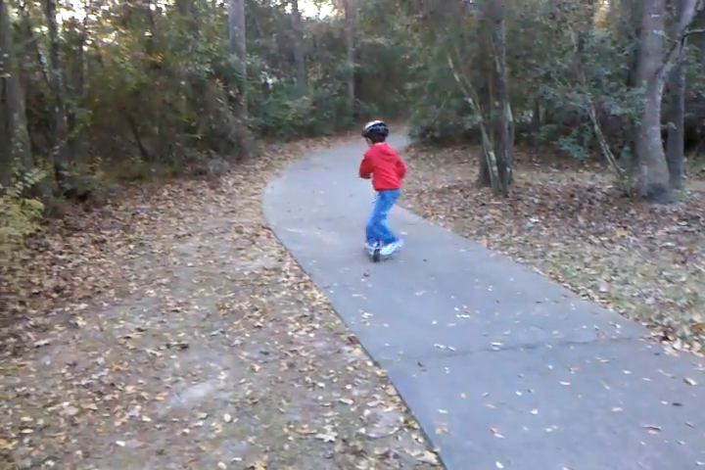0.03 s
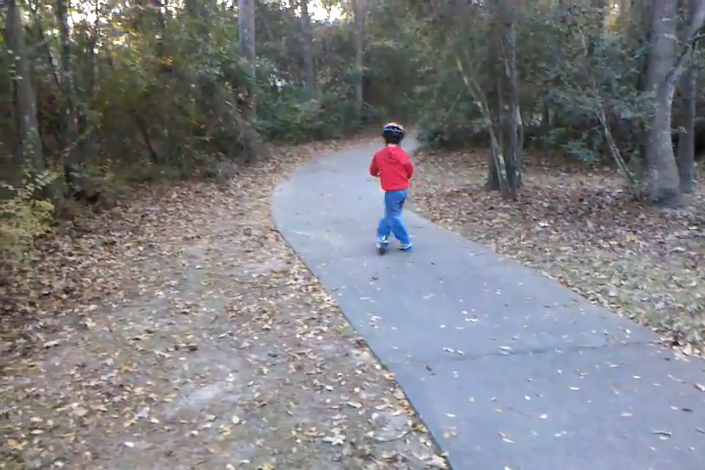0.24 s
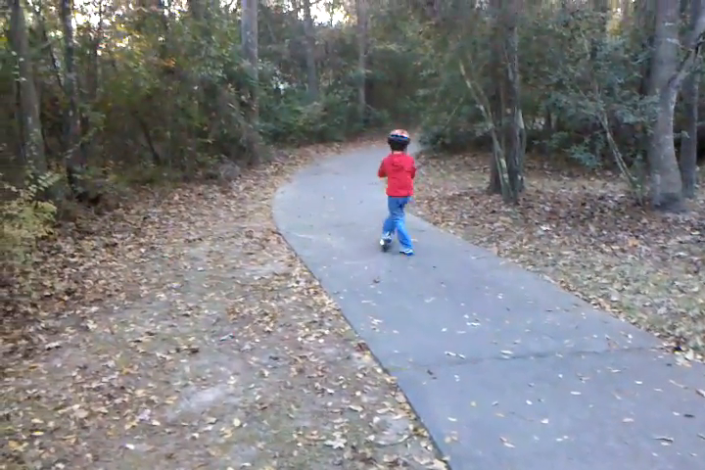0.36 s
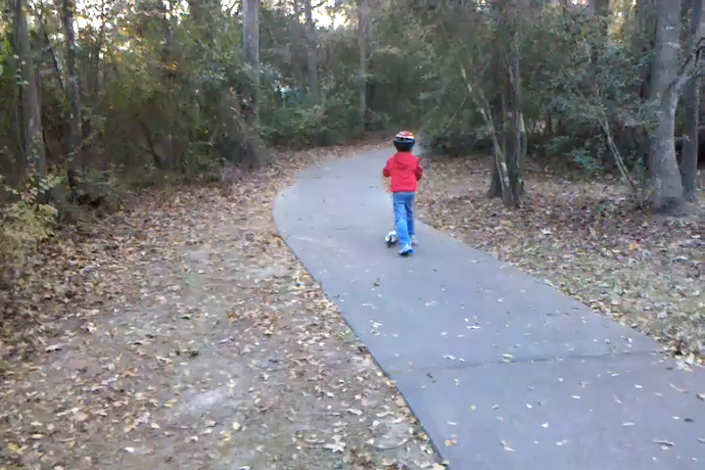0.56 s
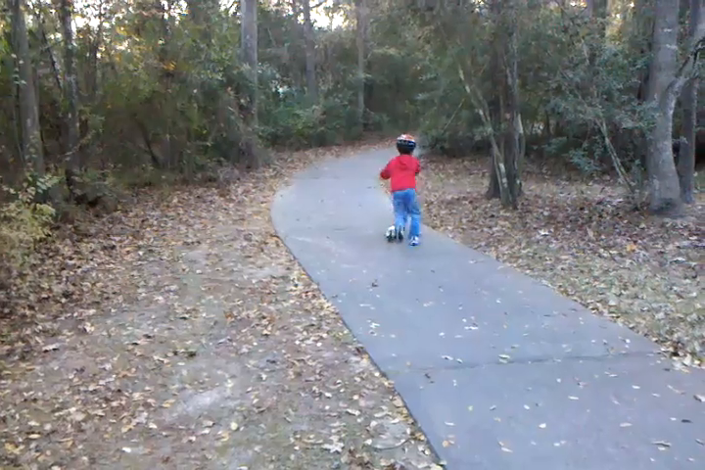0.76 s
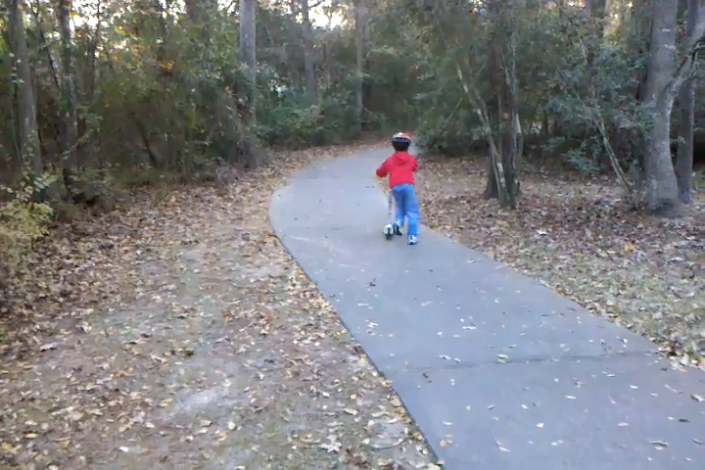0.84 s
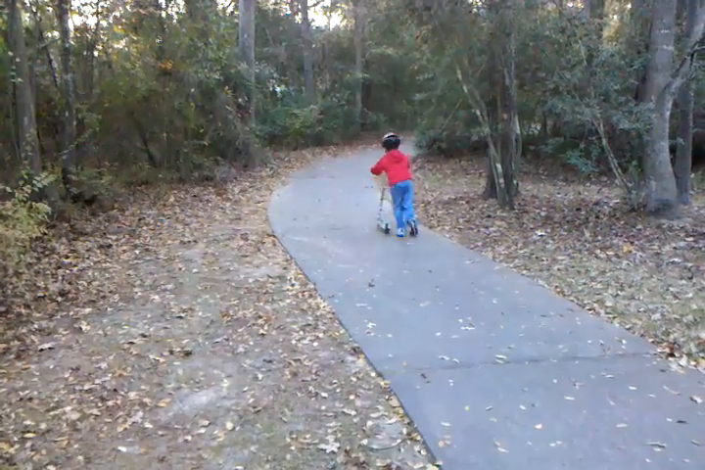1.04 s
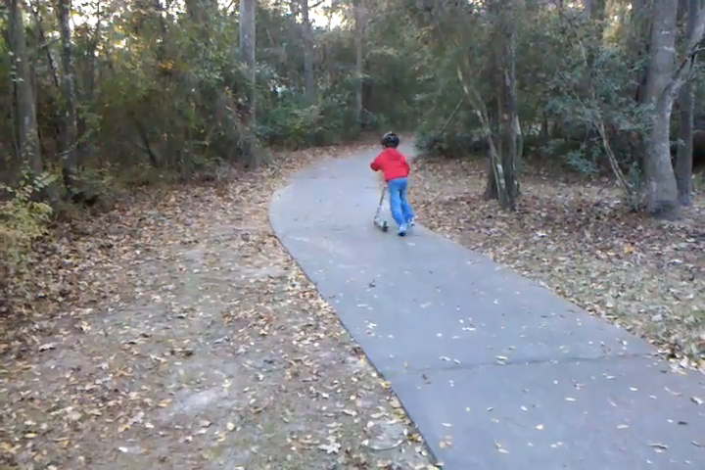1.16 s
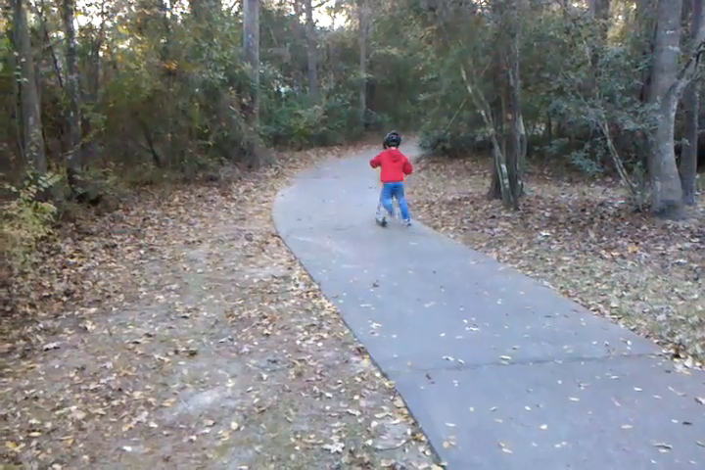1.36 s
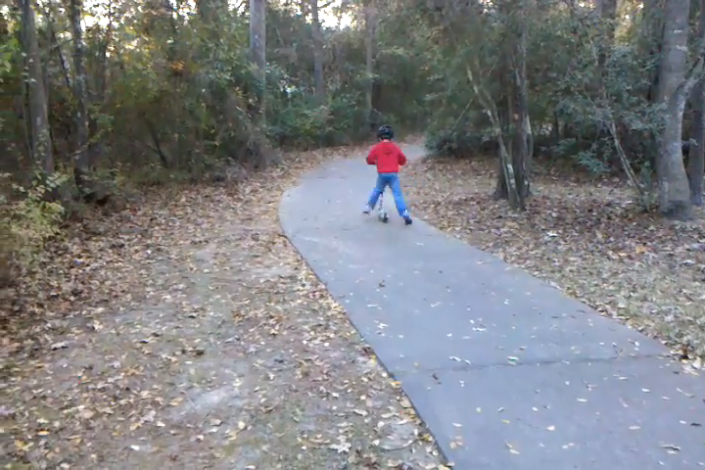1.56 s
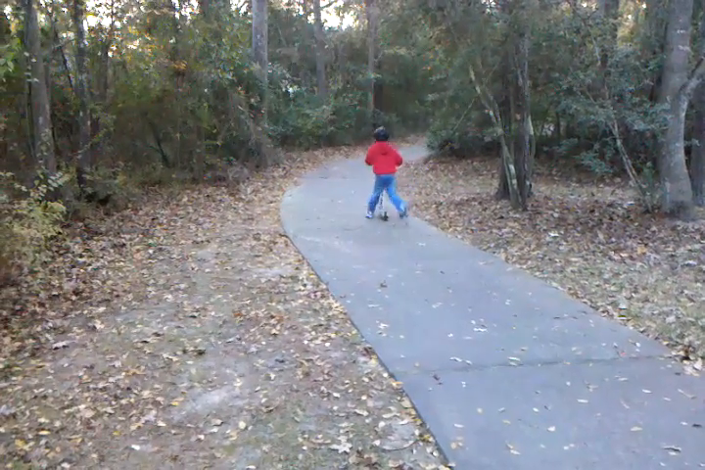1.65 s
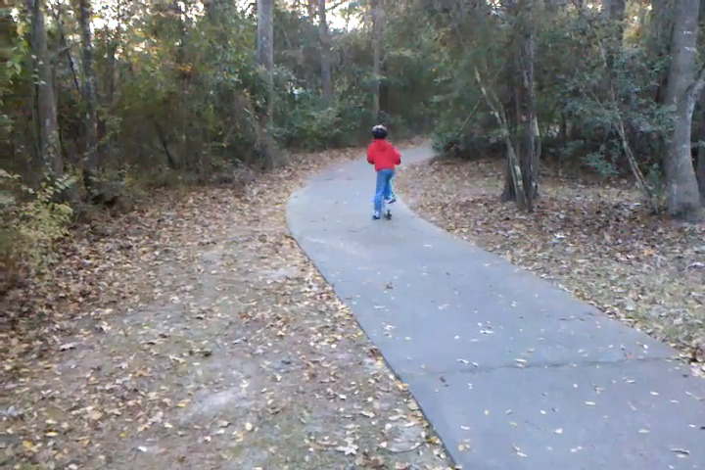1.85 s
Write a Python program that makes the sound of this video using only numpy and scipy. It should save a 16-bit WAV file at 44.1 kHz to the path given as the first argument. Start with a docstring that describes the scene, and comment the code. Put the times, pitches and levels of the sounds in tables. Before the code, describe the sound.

A kick scooter clacks sharply, then rolls on with light clinks and pushing footfalls.

```python
"""A kick scooter rolls away from the microphone along a paved path in the woods.
Its metal deck clacks down hard and bounces, a loose steering joint clinks, and the small wheels rumble
and tick over grit. The rider's shoe thuds and scuffs on the asphalt. Around the path, tree trunks
scatter a soft, bright tail. Heard in mono on a small microphone with no deep bass and little top end."""
import sys
import numpy as np
from scipy import signal
from scipy.fft import rfft, irfft
from scipy.io import wavfile

SR = 44100
rng = np.random.default_rng(int(sys.argv[2]) if len(sys.argv) > 2 else 0)


def to_wav(s):
    """Save 16-bit WAV."""
    ch = np.atleast_2d(s).T  # columns
    pcm = np.round(np.clip(ch, -1, 1) * 32767)  # PCM
    wavfile.write(sys.argv[1], SR, pcm.astype(np.int16))


N = 83790
T = np.arange(N) / SR

# Levels in all tables are relative; each source adds its own offset.
# the deck lands and bounces: (time [s], level [dB], extra level of the dull body [dB])
DECK_BOUNCES = [(0.0123, -46, 10), (0.0331, -49.5, 9.5), (0.2020, -20, -2.5), (0.2202, -27, -2.5),
                (0.2366, -35, 2), (0.2507, -42, 9.5), (1.6945, -49.5, 12.5), (1.698, -56, -6)]
# ringing modes of the deck: (frequency [Hz], level [dB], t60 [s])
DECK_MODES = [(1036, -23.5, 0.04), (1550, -17, 0.018), (1980, -21, 0.033), (2233, -22.5, 0.11),
              (3623, -5.5, 0.042), (4110, -13, 0.038), (4450, -10, 0.023), (4870, -8, 0.047),
              (5500, -3, 0.028), (5710, 0.5, 0.017), (6580, -10, 0.034)]
# its dense, quickly damped modes: (frequency [Hz], level [dB])
CRACK_SPECTRUM = [(200, -25), (1000, -22.5), (2900, -18), (3650, -8), (4200, -6.5), (4900, -8.5),
                  (5750, -0.5), (6250, -12), (7000, -9.5), (8500, -17)]
# its duller body: (frequency [Hz], level [dB])
BODY_SPECTRUM = [(100, -24), (300, 2), (750, -10), (1050, -1.5), (1300, -13), (1700, 3), (2000, -7),
                 (2250, -1.5), (2450, -3), (2900, -8.5), (5000, -17.5)]
# the loose joint knocks: (time [s], level [dB], extra ring [dB], extra for the low modes [dB])
JOINT_CLINKS = [(0.0930, -56, -1, 3), (0.126, -60, -7, 3), (0.1532, -56.5, 8, -14), (0.4726, -57, -4, -6),
                (0.5114, -53.5, -1, -9), (0.518, -53.5, -7, -8), (0.6390, -60, -8, 13),
                (0.6820, -65, -3, 19), (0.733, -56.5, -19, 0), (0.774, -54, -5, -5), (0.796, -55, 3.5, -6),
                (0.8958, -69, -8, -3), (1.0181, -47, -18, -7), (1.1064, -39, -10, 6.5),
                (1.1500, -51.5, -2, 6), (1.1521, -40.5, 2.5, -4.5), (1.1650, -51.5, 5, -3),
                (1.191, -48, -2, 3), (1.2202, -39.5, 5, -1), (1.261, -59, 2, -3), (1.3126, -40.5, -5, -5),
                (1.3173, -43.5, 5.5, -7), (1.339, -47, -9, 6), (1.357, -55, -5, -2),
                (1.4272, -44, -6.5, -5), (1.491, -57, 5, -8), (1.513, -57, 0.5, -1),
                (1.5429, -53.5, 2, -12), (1.5786, -48, -15, -2), (1.5875, -61, -6, -10),
                (1.619, -61, 7, -5), (1.6575, -59, -8, -1), (1.693, -56.5, 3.5, 12), (1.7932, -48, -21, 9),
                (1.822, -50.5, -20, 9), (1.8390, -52.5, -5, 6), (1.8582, -51, -11, -5)]
# modes of the steering tube: (frequency [Hz], level [dB], t60 [s])
TUBE_MODES = [(2058, -15.5, 0.12), (3460, -14, 0.024), (3406, -2.5, 0.02), (3850, -1, .03),
              (4500, -8, 0.031), (5770, -5, 0.1), (5850, -0.5, 0.058), (5800, -13, 0.074),
              (6700, -11.5, 0.023), (6830, -9.5, 0.08)]
# the tick that starts each clink: (frequency [Hz], level [dB])
TICK_SPECTRUM = [(300, -17), (1000, -2.5), (1700, -7.5), (2800, -5.5), (3700, 1), (4700, -2), (6000, 1.5),
                 (6900, -2), (8500, -4)]
# footfalls: (time [s], thump [dB], sole slap [dB], hard tap [dB], grit [dB])
FOOTFALLS = [(0.6092, -42, -63, -64, -58.5), (0.9360, -31, -30, -47.5, -43),
             (1.2735, -46.5, -35.5, -48.5, -48), (1.2910, -53.5, -37.5, -62, -51.5),
             (1.6086, -31, -29, -35, -43.5), (1.6766, -59, -55, -46.5, -67)]
# the hard edge of the sole: (frequency [Hz], level [dB], t60 [s])
TAP_MODES = [(975, -4, 0.013), (1524, 2, 0.014), (1750, -4, 0.015), (2550, -6.5, 0.008)]
# grit crunching underfoot: (frequency [Hz], level [dB])
GRIT_SPECTRUM = [(200, -16), (600, 5), (1200, -5.5), (1600, -8.5), (2200, -2), (2700, -5.5), (3400, -13),
                 (5000, -10), (8000, -15.5)]
# the sole scuffs: (time [s], length [s], level [dB])
SOLE_SCUFFS = [(0.562, 0.021, -59), (0.912, 0.027, -60), (1.271, 0.012, -47.5), (1.424, 0.018, -56),
               (1.573, 0.025, -52), (1.621, 0.0066, -49.5), (1.633, 0.042, -59.5), (1.688, .011, -50),
               (1.7, 0.012, -56.5)]
# sole dragging on asphalt: (frequency [Hz], level [dB])
SCUFF_SPECTRUM = [(300, -13.5), (1000, 8), (1800, -6.5), (2250, 0.5), (2800, 3), (3500, 6.5), (4700, 2.5),
                  (6200, 7), (8000, -16.5)]
# wheels on rough asphalt: (time [s], level [dB])
ROLL_LEVELS = [(0, -62.5), (.4, -68.5), (.6, -62.5), (.72, -66), (.82, -60), (1.0, -61), (1.3, -62),
               (1.52, -61.5), (1.68, -63), (1.76, -63.5), (1.82, -57.5), (1.9, -66.5)]
# their hiss and ticks: (frequency [Hz], level [dB])
ROLL_SPECTRUM = [(500, -10.5), (1600, 0), (2800, -9), (3600, -1), (4300, 1.5), (5200, -7.5), (5850, -1),
                 (6700, -4), (8500, -19)]
# a wheel skids: (time [s], length [s], level [dB])
WHEEL_SKIDS = [(0.137, 0.039, -54.5), (0.191, 0.0082, -45)]
# the thin hiss of a skid: (frequency [Hz], level [dB])
SKID_SPECTRUM = [(1500, -16), (3500, -14), (4500, -2), (5100, -6), (5600, 2), (6300, -11), (8000, -11.5)]
# echoes off trunks and leaves: (frequency [Hz], level [dB])
ECHO_SPECTRUM = [(100, -21.5), (600, -2), (1700, -1.5), (2700, 0), (3900, -3), (4900, 2.5), (5700, -5.5),
                 (6800, -0.5), (9000, 1.5)]
# wheel rumble and the air of the woods: (frequency [Hz], level [dB])
RUMBLE_SPECTRUM = [(25, -12.5), (50, -21), (80, -4.5), (120, 1), (160, 2), (195, 0.5), (250, -4.5),
                   (500, -5), (800, -10.5), (1500, -15.5), (3000, -21), (7000, -27)]

CONTACT_S, LOW_MODES_BELOW_HZ = 0.0004, 4500
RUMBLE_DB, RUMBLE_DB_PER_S = -60, -1.27
MIC_LOW_HZ, MIC_TOP_HZ, MIC_LEAK_DB, MIC_LIMIT_HZ = 82, 7070, -31.5, 9100


def deck():
    """Each bounce gives a crack, a dull body and a metallic ring; the deck is too small to radiate bass."""
    times, db, body_db = np.transpose(DECK_BOUNCES)
    crack = bursts(times - 0.0005, db + 0.5, attack_s=0.00094, t60=0.01, hold_s=0.00067)
    body = bursts(times, db + body_db - 13.5, attack_s=0.001, t60=0.023, hold_s=0.002)
    clack = noise(CRACK_SPECTRUM) * crack + noise(BODY_SPECTRUM) * body
    metal = strike(times + 0.00018, db - 7.5, DECK_MODES, vary_db=0.5)
    return butterworth(clack + metal, "high", hz=257, order=2)


def steering_joint():
    """Play in the steering column: a tick, a short buzz, and the tube rings."""
    times, db, ring_db, low_db = np.transpose(JOINT_CLINKS)
    tick = bursts(times, db + 3.5, attack_s=0.0004, t60=0.01)
    buzz = bursts(times, db - 6.5, attack_s=0.0036, t60=0.065)
    rattle = noise(TICK_SPECTRUM) * (tick + buzz)
    return rattle + strike(times + 0.0004, db + ring_db - 3.5, TUBE_MODES, vary_db=1, low_db=low_db)


def footfalls():
    """The shoe lands: its soft sole thumps and slaps, its hard edge taps, and grit crunches."""
    times, thump_db, slap_db, tap_db, grit_db = np.transpose(FOOTFALLS)
    thump = ring(times + 0.00047, thump_db, hz=196.5, t60=0.028)
    slap = ring(times, slap_db, hz=460, t60=0.018)
    thud = butterworth(thump + slap, "low", hz=900, order=2)
    tap = strike(times + 0.00137, tap_db, TAP_MODES, vary_db=1.2)
    crunch = noise(GRIT_SPECTRUM) * bursts(times, grit_db, attack_s=0.0013, t60=0.029, hold_s=0.001)
    return thud + tap + crunch


def scuffs():
    """The sole drags over grit in short, grainy hisses."""
    times, length, db = np.transpose(SOLE_SCUFFS)
    drag = rms_one(noise(SCUFF_SPECTRUM) + coloured(grains(per_s=1500, spread_db=1), SCUFF_SPECTRUM))
    return drag * bursts(times, db, attack_s=0.006, t60=0.025, hold_s=length - 0.003)


def wheels():
    """Small wheels hiss on the asphalt, tick over grit and briefly skid."""
    hiss = noise(ROLL_SPECTRUM)
    ticks = coloured(grains(per_s=260, spread_db=-5), ROLL_SPECTRUM)
    roll_gain = from_db(np.interp(T, *np.transpose(ROLL_LEVELS)) - 3)
    times, length, db = np.transpose(WHEEL_SKIDS)
    skids = noise(SKID_SPECTRUM) * bursts(times, db, attack_s=0.0063, t60=0.057, hold_s=length - 0.005)
    return rms_one(hiss + ticks) * roll_gain + skids


def woods(x):
    """Trunks and leaves around the path send many small echoes back to the microphone."""
    decay = bursts([0.004], [0], attack_s=0.0094, t60=0.48)
    echoes = coloured(grains(per_s=4000, spread_db=5.5), ECHO_SPECTRUM) * decay
    echoes /= np.sqrt(np.sum(echoes ** 2))
    return from_db(-7) * signal.fftconvolve(x, echoes)[:N]


def rumble():
    """Low wheel rumble and woodland air, fading slightly as the scooter gains distance."""
    return from_db(RUMBLE_DB + RUMBLE_DB_PER_S * T) * noise(RUMBLE_SPECTRUM)


def strike(times, db, modes, vary_db, low_db=0):
    """Blows on a body, each with a slightly different balance of its modes."""
    shape = (len(times), len(modes))
    uneven_db = vary_db * rng.standard_normal(shape)
    lag = CONTACT_S * rng.random(shape)
    ringing = np.zeros(N)
    for k, (hz, level, t60) in enumerate(modes):
        mode_db = db + level + uneven_db[:, k] + low_db * (hz < LOW_MODES_BELOW_HZ)
        ringing += ring(times + lag[:, k], mode_db, hz, t60)
    return ringing


def ring(times, db, hz, t60):
    """Each blow sets one damped mode ringing."""
    blows = np.zeros(N)
    blows[np.clip(times * SR, 0, N - 1).astype(int)] = from_db(db)
    radius = np.exp(-np.log(1000) / (t60 * SR))
    angle = 2 * np.pi * hz / SR
    return signal.lfilter([0.5, 0, -0.5], [1, -2 * radius * np.cos(angle), radius ** 2], blows + 1e-18)


def bursts(times, db, attack_s, t60, hold_s=0):
    """Sum of envelopes that rise, hold and die away."""
    age = T - np.asarray(times)[:, None]
    rise = np.clip(age / attack_s, 0, 1)
    falling_s = np.maximum(age - attack_s - np.reshape(hold_s, (-1, 1)), 0)
    fall = np.exp(-np.log(1000) * np.minimum(falling_s / t60, 10))
    return from_db(db) @ (rise * fall)


def grains(per_s, spread_db):
    """Random clicks of uneven size."""
    sizes = from_db(spread_db * np.minimum(rng.exponential(1, N), 4)) * rng.choice([-1, 1], N)
    return sizes * (rng.random(N) < per_s / SR)


def noise(spectrum):
    """Coloured noise of rms 1."""
    return coloured(rng.standard_normal(N), spectrum)


def coloured(x, spectrum):
    """Give a steady signal a spectrum; rms 1."""
    hz, db = np.transpose(spectrum)
    bin_hz = np.maximum(np.arange(N // 2 + 1) * SR / N, 1)
    gain = from_db(np.interp(np.log(bin_hz), np.log(hz), db))
    return rms_one(irfft(rfft(x) * gain, N))


def butterworth(x, kind, hz, order):
    """Low-pass or high-pass filter."""
    return signal.sosfilt(signal.butter(order, hz, kind, fs=SR, output="sos"), x)


def rms_one(x):
    """Scale to rms 1."""
    return x / np.sqrt(np.mean(x ** 2) + 1e-20)


def from_db(db):
    """Decibels to gain."""
    return 10 ** (np.asarray(db) / 20)


def scene():
    """From the path: scooter and shoe echo among the trees, over rolling wheels and a receding rumble."""
    direct = deck() + steering_joint() + footfalls() + scuffs()
    return (direct + woods(direct) + wheels() + rumble())[None]


def record(dry):
    """A small microphone: no deep bass, and only a trace of top end leaks through, up to a steep limit."""
    thin = butterworth(dry, "high", MIC_LOW_HZ, order=3)
    dull = butterworth(thin, "low", MIC_TOP_HZ, order=26)
    band_limit = signal.ellip(10, 0.5, 80, MIC_LIMIT_HZ, fs=SR, output="sos")
    return signal.sosfilt(band_limit, dull + from_db(MIC_LEAK_DB) * thin)


dry = scene()
out = record(dry)
to_wav(out)
```